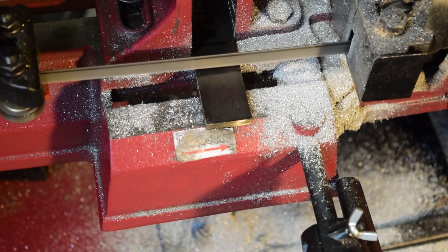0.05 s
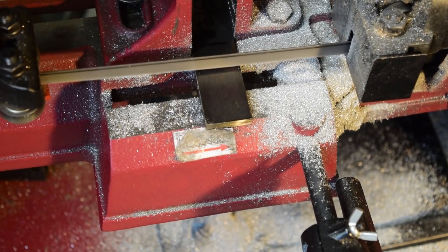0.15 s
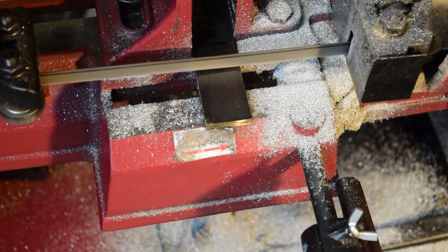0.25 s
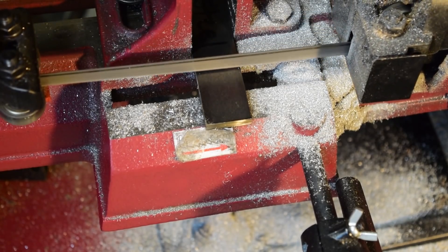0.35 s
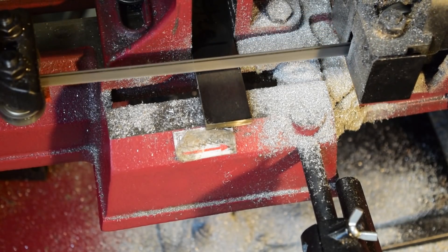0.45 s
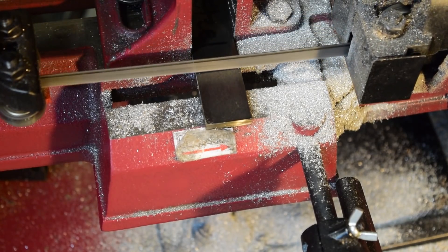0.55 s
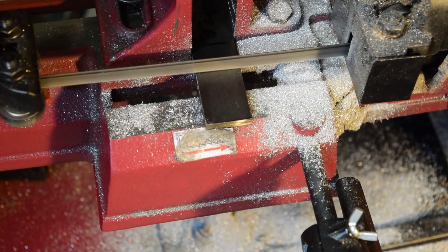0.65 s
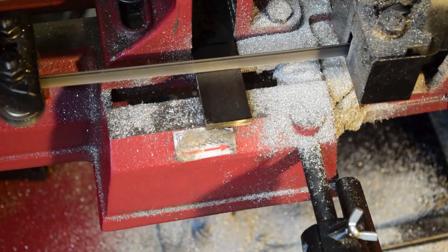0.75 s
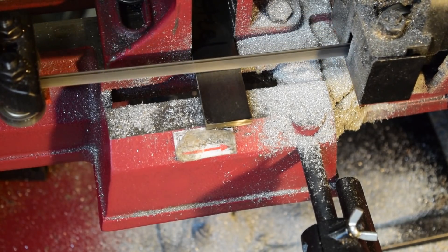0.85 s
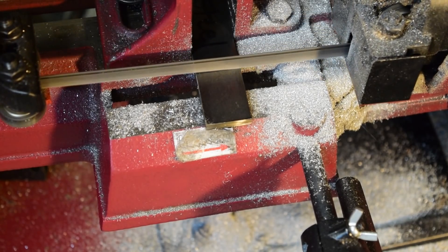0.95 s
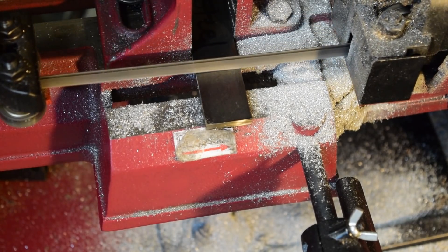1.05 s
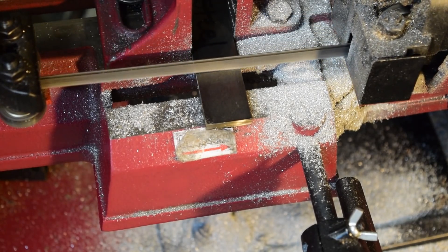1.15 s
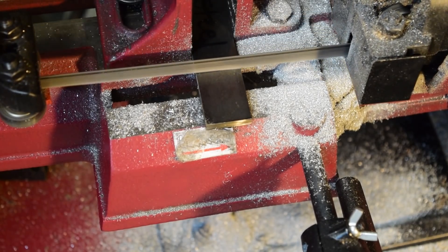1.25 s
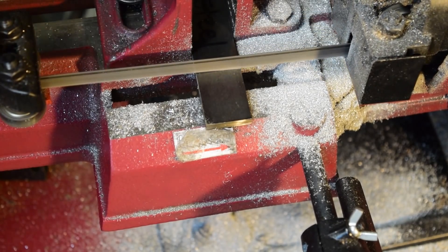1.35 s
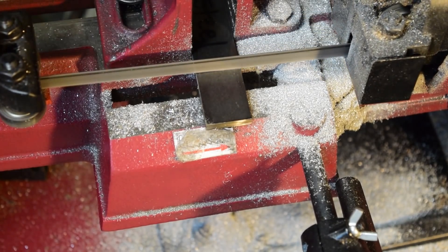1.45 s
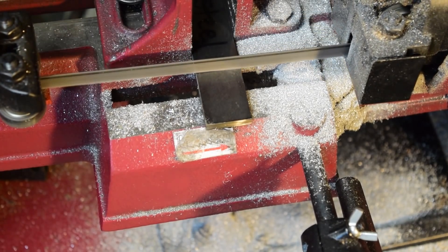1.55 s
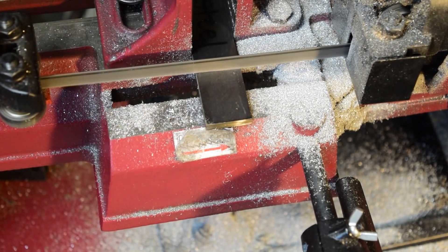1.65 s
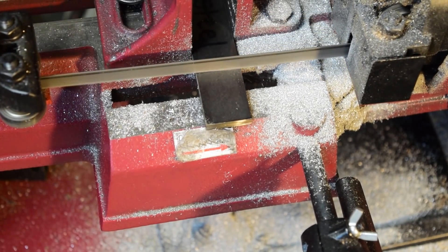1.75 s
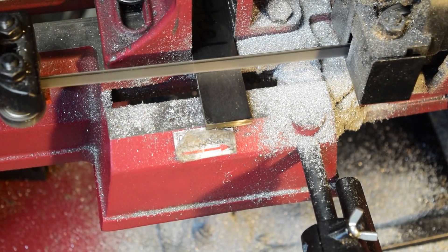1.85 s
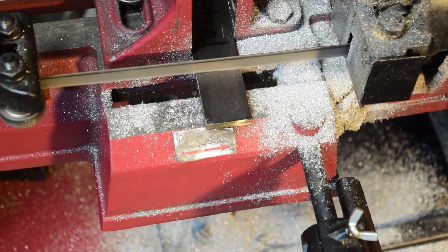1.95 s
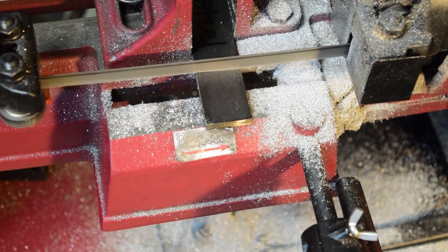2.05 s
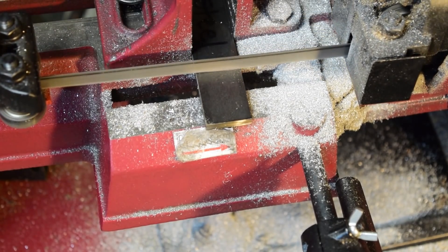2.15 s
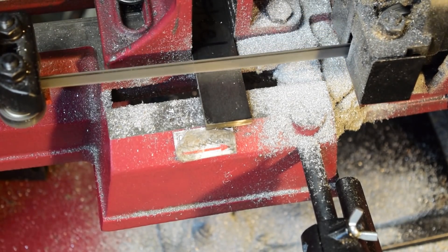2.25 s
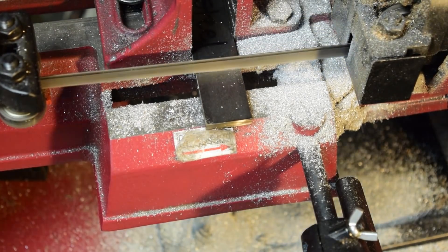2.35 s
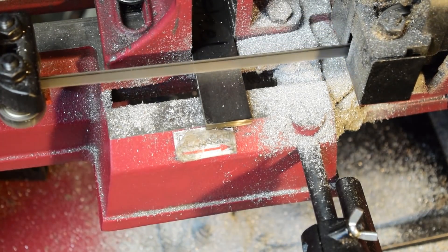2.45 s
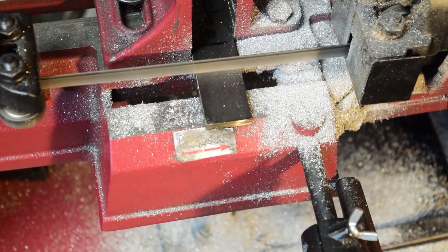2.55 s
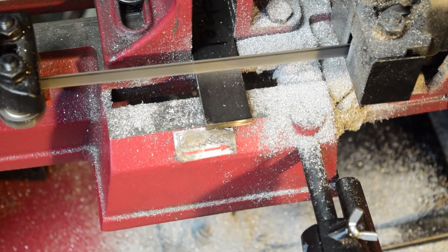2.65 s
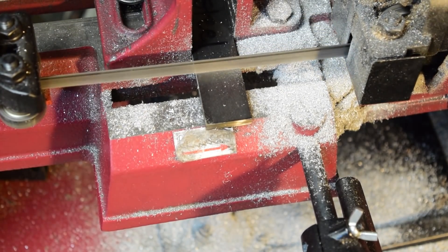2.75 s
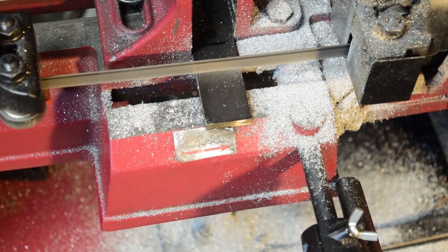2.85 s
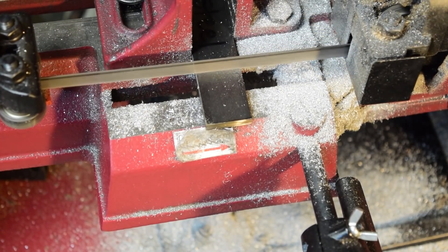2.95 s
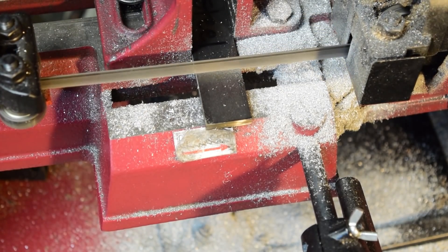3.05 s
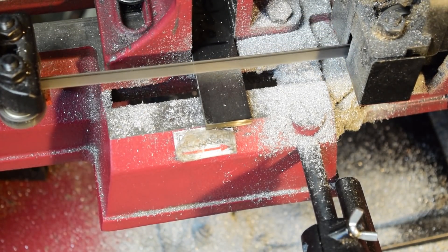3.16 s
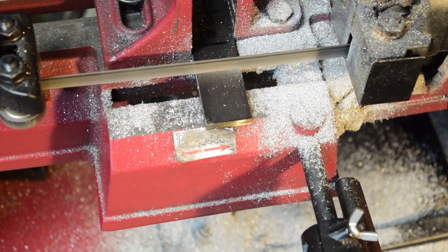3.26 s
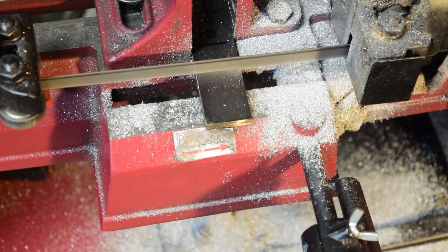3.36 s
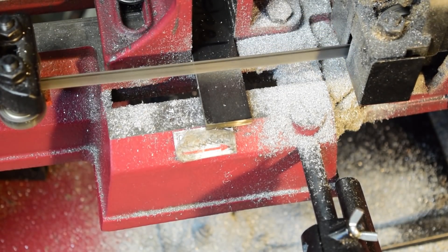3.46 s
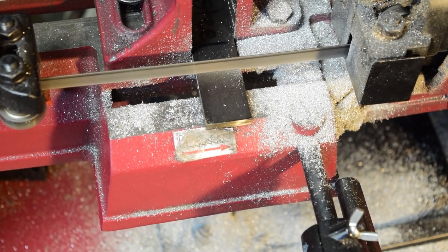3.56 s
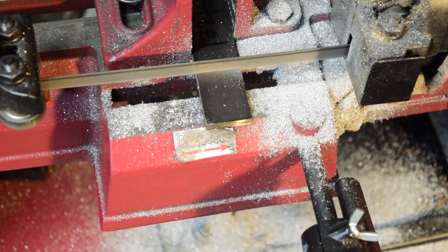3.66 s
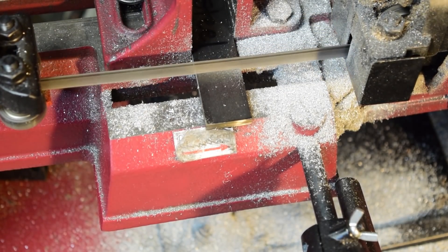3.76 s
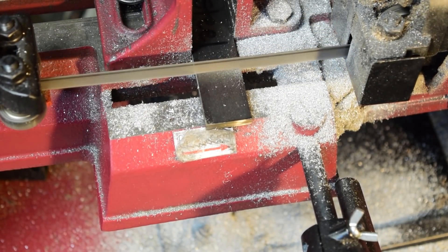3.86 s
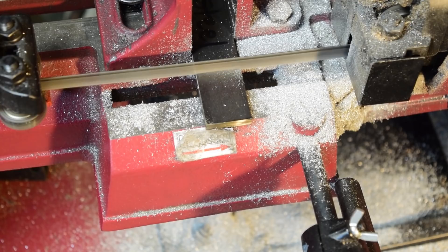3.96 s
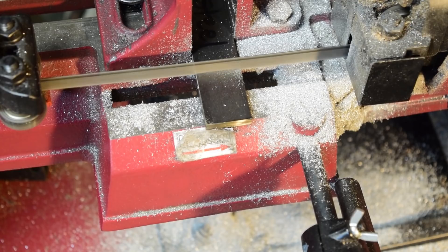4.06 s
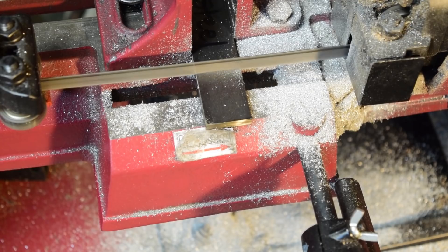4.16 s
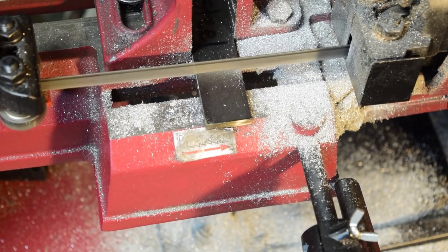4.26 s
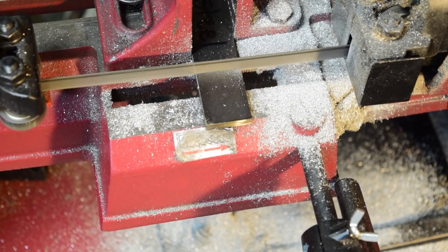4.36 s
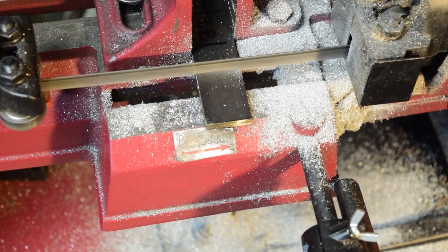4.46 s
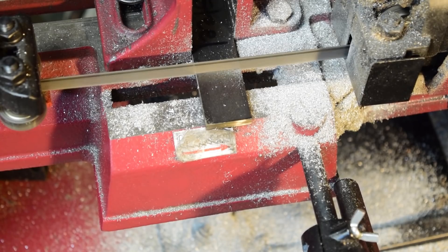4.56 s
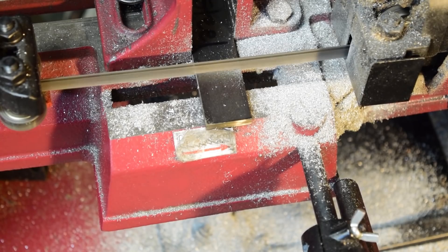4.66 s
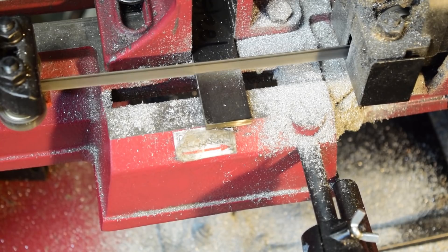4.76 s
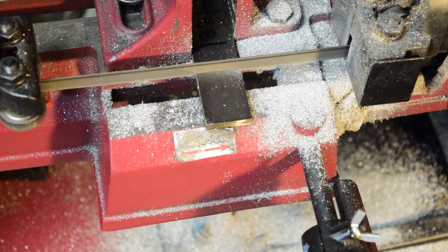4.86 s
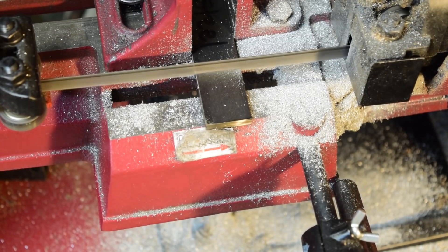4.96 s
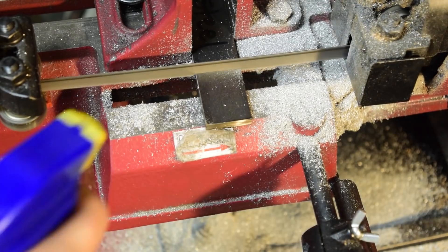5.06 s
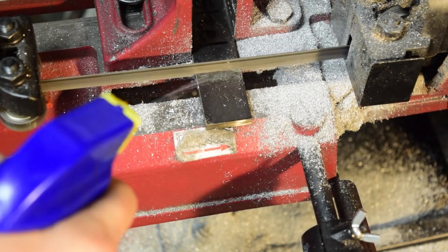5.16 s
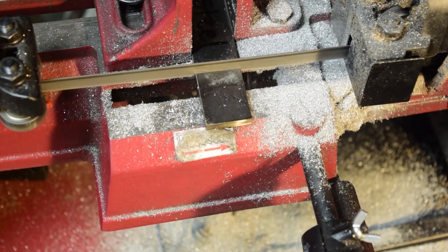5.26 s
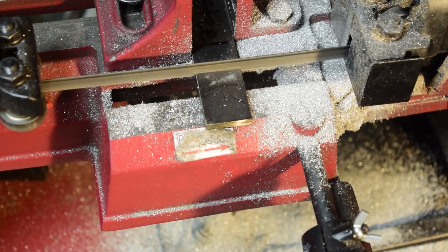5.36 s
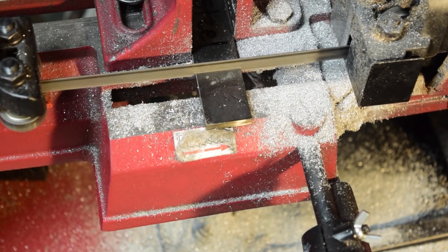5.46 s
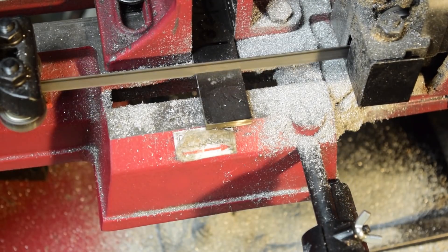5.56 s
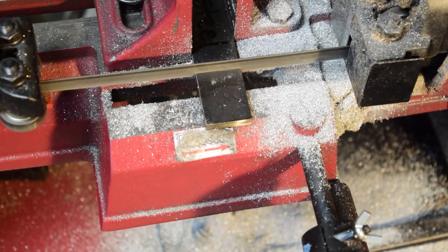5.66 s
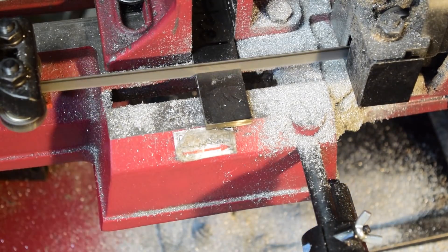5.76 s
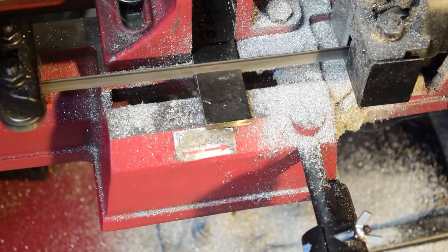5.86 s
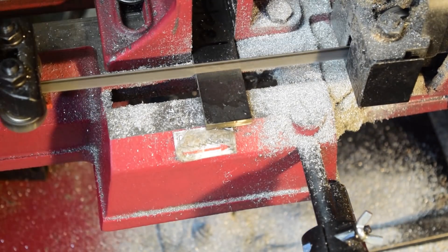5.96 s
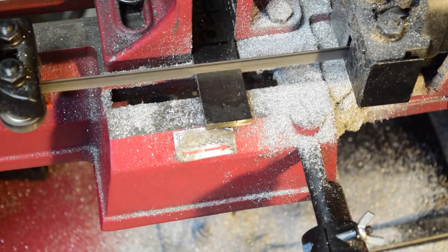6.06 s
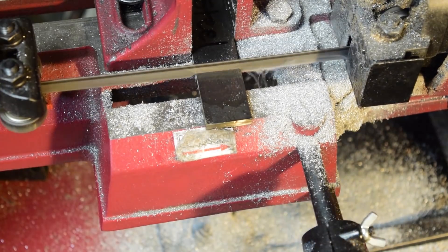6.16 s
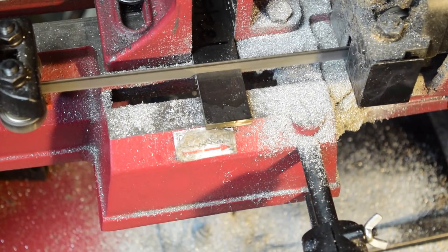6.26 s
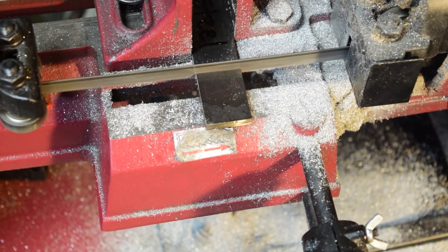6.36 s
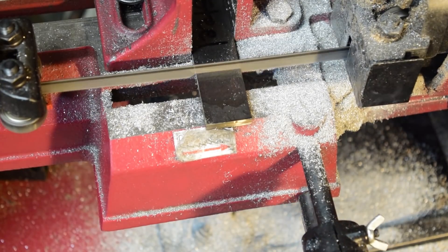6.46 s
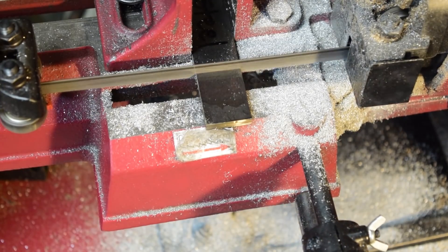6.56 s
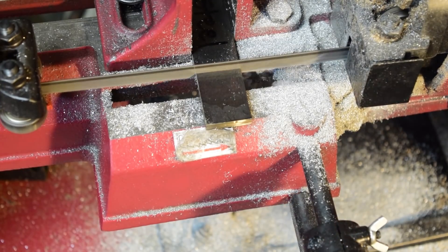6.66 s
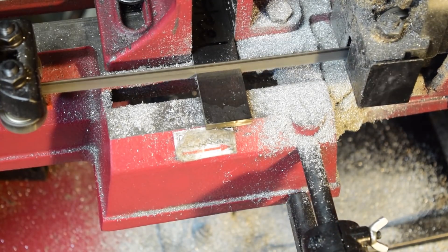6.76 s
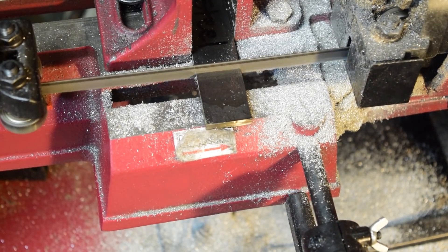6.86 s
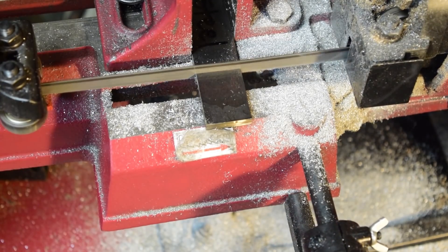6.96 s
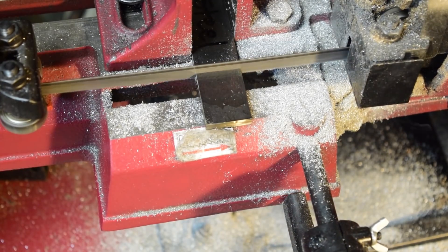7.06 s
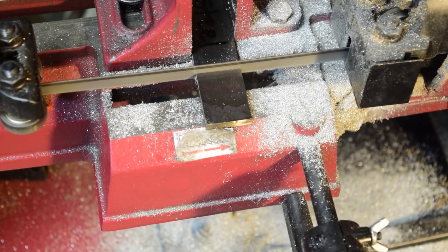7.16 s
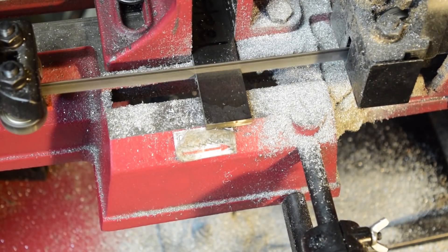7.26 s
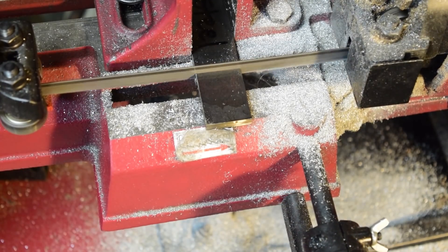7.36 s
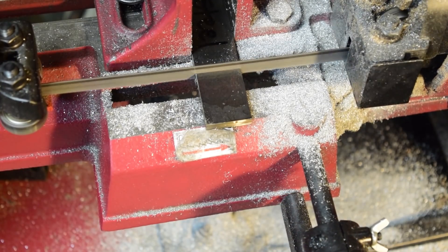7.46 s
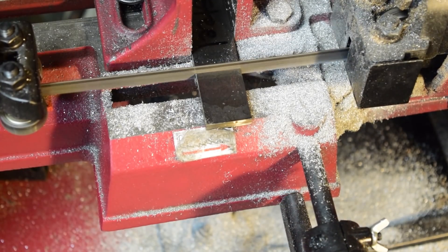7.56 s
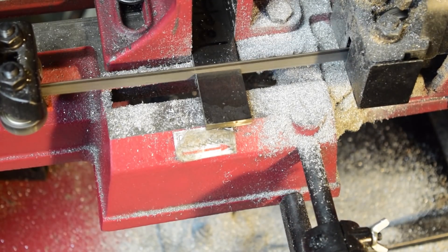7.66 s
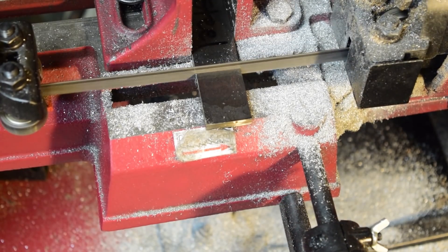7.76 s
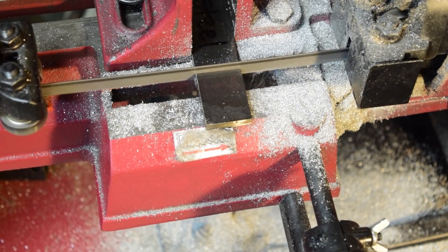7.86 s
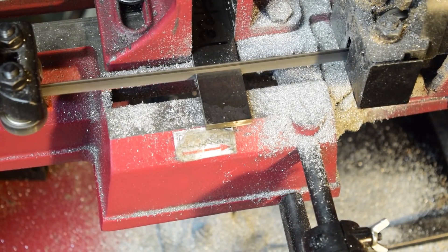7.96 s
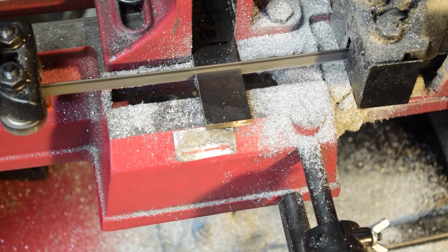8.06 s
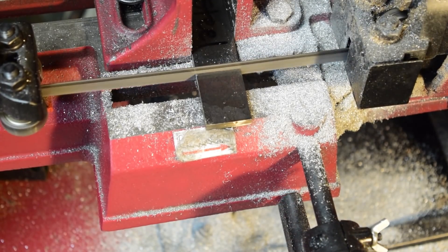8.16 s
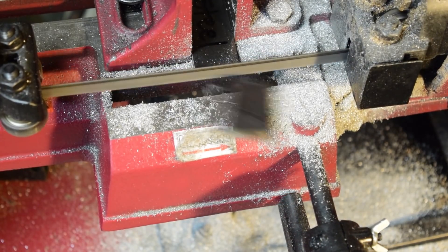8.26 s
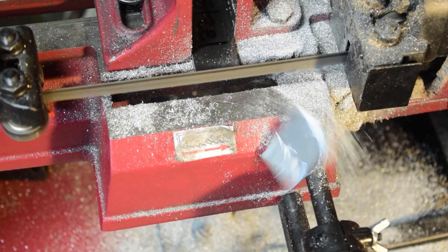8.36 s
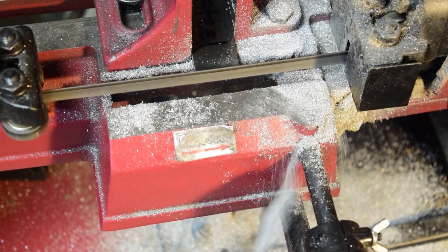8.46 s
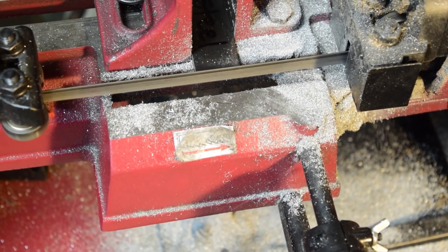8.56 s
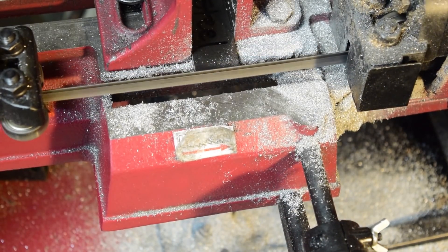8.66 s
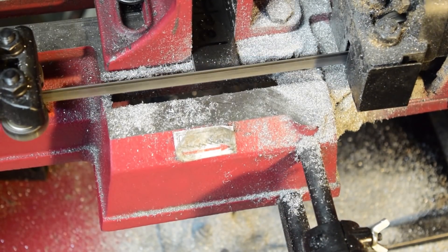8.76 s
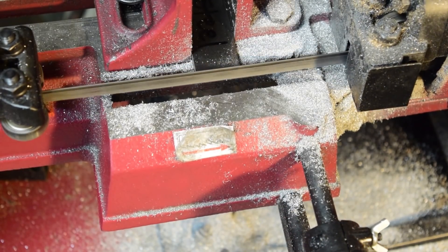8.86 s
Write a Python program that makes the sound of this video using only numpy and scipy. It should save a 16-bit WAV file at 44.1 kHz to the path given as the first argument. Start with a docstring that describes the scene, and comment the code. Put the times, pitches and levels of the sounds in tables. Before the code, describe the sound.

Close metal sawing: rattly motor hum, scraping contact, gritty rasp and throbbing high squeal, then late yelps, a plunging ring and a bright steel clang.

```python
"""In a workshop, close to a horizontal band saw: the motor hums and shakes the frame, the blade touches a steel
bar, bites, squeals for over three seconds and rasps on until the offcut breaks free and clangs on the floor.
Motor, teeth and squeal are noise and tones ringing through resonances; scrapes, chirps and ticks are short bursts.
Through the middle of the cut these steady layers come back in fading copies about 43 ms apart."""
import sys
import numpy as np
from scipy import signal
from scipy.fft import rfft, irfft, next_fast_len
from scipy.io import wavfile
from scipy.ndimage import uniform_filter1d, map_coordinates

SR = 44100
rng = np.random.default_rng(int(sys.argv[2]) if len(sys.argv) > 2 else 0)


def dump(signal):
    """Clip the signal to [-1, 1] and save it as 16-bit WAV at the path in sys.argv[1]."""
    limited = np.clip(np.atleast_2d(signal).T, -1, 1)
    pcm = np.round(limited * 32767).astype(np.int16)
    wavfile.write(sys.argv[1], SR, pcm)


N = 393318

# Motor and frame. Each row: time in seconds, hum level in dB, frame level in dB.
DRIVE_LEVELS = [(0, -41.5, -37), (.45, -40.5, -33.5), (1.05, -45.5, -33.5), (2.3, -45, -35),
                (2.4, -45.5, -33.5), (2.75, -56, -42), (3.7, -62, -47), (5.4, -62, -48.5), (5.46, -60, -43),
                (6.2, -59.5, -39.5), (8.16, -56, -36.5), (8.2, -53, -33), (8.26, -60, -34),
                (8.32, -56, -37), (8.45, -47, -36.5), (8.48, -58, -40.5), (8.55, -61, -42),
                (8.7, -72, -45.5)]
# Load on the drive. Each row: time in seconds, share from 0 to 1.
LOAD = [(0, 0), (1.1, 0.02), (1.4, 0.52), (2.3, 0.59), (2.8, 1), (8.92, 0.87)]
# Low rumble of the motor. Each row: frequency in Hz, relative density in dB.
RUMBLE_COLOUR = [(24, -58), (40, -40), (65, -12), (85, -14), (108, 3), (135, -11), (168, -5.5), (231, 1.5),
                 (311, -4.5), (350, -1), (460, -32), (770, -120)]
# Resonances of the frame. Each row: centre in Hz, width in Hz, relative gain running light in dB, under load in dB.
FRAME_MODES = [(221.4, 22, -5.5, -20.5), (281.8, 12, -5.5, -13), (359.6, 13.3, -2, -8.5),
               (400.3, 26.5, -5, -4.5), (454.8, 23.2, 2.5, -1), (472.8, 24, -3.5, 0.5),
               (611, 112, -8.5, -10.5), (793, 26.5, -10, -6.5), (860, 31.6, 5, -4.5), (899.4, 47, -0.5, -5),
               (1133, 300, -14, -14), (1629, 134, -9, -13), (1790, 140, -19.5, -16.5), (2285, 69, -16, -27),
               (3300, 26, -30, -32), (4410, 94, -12.5, -20), (4860, 150, -14, -33)]
# Motor noise between those resonances. Each row: frequency in Hz, relative density in dB.
WHIR_COLOUR = [(30, -41), (120, -14), (200, -15), (321, -8), (454, -9.5), (677, -8), (874, -4.5),
               (1280, -13.5), (4920, -19.5), (10400, -36), (15500, -57)]
# Gear tones. Each row: frequency in Hz, level against the frame running light in dB, under load in dB.
GEAR_TONES = [(280, -15.5, -43), (360, -20, -55), (476.5, -37, -3), (774, -4, -27), (803, -7, -42),
              (844, -9.5, -37), (891.5, -9, -16), (1026, -15, -48), (1210, -14, -70), (1643, -23, -60),
              (1870, -12.5, -50)]
DRIVE_SWAY_DB, CUT_SWAY_DB = 1, 0.7  # random wander of the levels, rms

# Knocks in the frame. Each row: start in seconds, low mode level in dB, upper modes level in dB.
KNOCKS = [(0.454, -26, -30), (2.403, -36, -37), (2.685, -31.5, -36), (5.006, -35, -36.5), (8.186, -27, -38),
          (8.204, -28, -27), (8.232, -36, -27), (8.279, -33, -40), (8.345, -31, -42), (8.381, -32, -33)]
# What a knock rings. Each row: centre in Hz, width in Hz, relative gain in dB.
KNOCK_MODES = [(457, 28, 0), (937, 70, -2), (1440, 41, -6)]
# A lumpy low flutter through the middle of the cut. Each row: time in seconds, level in dB.
FLUTTER_LEVELS = [(0, -90), (2.25, -113), (2.3, -75), (3, -67), (5.5, -67), (6.3, -66), (6.8, -80),
                  (8.2, -68), (8.5, -88)]

# Teeth in the steel. Each row: time in seconds, rasp level in dB, fizz level in dB.
CUT_LEVELS = [(0, -44.5, -55), (.62, -47, -56), (.655, -35.5, -40), (.8, -38.5, -47), (.87, -38.5, -43),
              (.93, -33, -41.5), (1.07, -33, -40), (1.15, -35, -42.5), (2.27, -35, -41), (2.31, -37, -42),
              (2.38, -30.5, -38.5), (2.55, -33, -39.5), (2.76, -36.5, -41.5), (3.7, -42, -44.5),
              (5.4, -45, -46), (5.46, -40.5, -45), (6.2, -38.5, -46.5), (8.02, -35, -41.5),
              (8.25, -38.5, -43), (8.31, -53, -46), (8.39, -42, -41), (8.41, -41, -54), (8.44, -48, -44),
              (8.47, -47, -47.5), (8.7, -63, -54), (8.85, -57, -66)]
# Depth of the blade. Each row: time in seconds, kerf stage (0 touch to 4 late, held at 0 below that),
# level of the ringing modes over the broad rasp in dB.
DEPTH = [(0, -1, -12), (.85, 0.7, 1), (.95, 1.16, 1.5), (2.3, 1.43, 1.5), (2.8, 1.2, -3.5),
         (5.4, 2.5, -0.5), (5.8, 2, -0.5), (6.9, 3, -3.5), (7.4, 3.5, -2.5), (8.3, 4, -10), (8.92, 4, -12)]
# Blade and bar resonances, one table per kerf stage. Each row: centre in Hz, width in Hz, relative gain in dB.
TOUCH_MODES = [(1660, 30, -3), (2240, 130, -2), (3070, 77, -12), (3240, 40, -5), (5360, 130, -3),
               (5800, 61, -7), (5950, 38, 0), (6270, 53, -2), (7170, 43, -7)]
SHALLOW_MODES = [(1643, 19, -1.5), (2060, 280, -6.5), (3105, 103, 3.5), (3177, 250, -1), (3836, 18, -1.5),
                 (4460, 120, -18), (5400, 55, -4.5), (5700, 68, -6), (6340, 70, -4.5), (6790, 44, -9),
                 (7120, 130, -14)]
HALFWAY_MODES = [(1610, 45, 0), (2357, 40, 2.5), (2436, 76, -2.5), (2840, 240, -11), (3004, 34, 1),
                 (3073, 58, 0), (3154, 60, 0.5), (3460, 43, -1.5), (4560, 260, -11), (5270, 66, -12),
                 (6100, 45, -4), (6330, 60, -15)]
DEEP_MODES = [(1444, 47, 3), (1900, 45, -23), (2350, 140, 0.5), (2710, 200, -2), (3040, 180, 2.5),
              (3740, 48, -2), (4500, 630, -3), (5900, 250, -16), (6900, 58, -13)]
LATE_MODES = [(1406, 29, 3.5), (1915, 100, -2), (2425, 65, 2.5), (2780, 120, -2), (3270, 130, 2),
              (4430, 100, -8), (4890, 55, -18), (5770, 260, -13), (6930, 75, -14)]
# High resonances that chips excite, shallow and deep. Each row: centre in Hz, width in Hz, relative gain in dB.
HIGH_SHALLOW_MODES = [(7660, 87, 8.5), (8520, 250, 0.5), (9820, 110, 2.5), (11500, 200, -0.5),
                      (12900, 300, -5)]
HIGH_DEEP_MODES = [(8840, 130, 6), (9440, 55, 6), (11300, 85, 2), (13360, 160, -6)]
# Broad part of the rasp, then the fizz of chips. Each row: frequency in Hz, relative density in dB.
RASP_COLOUR = [(530, -21.5), (900, -17), (1450, -11.5), (1740, -4.5), (1890, -1.5), (3060, -0.5),
               (3300, -1), (3500, -1), (8000, -32), (10400, -28), (17600, -120)]
FIZZ_COLOUR = [(2940, -47), (5000, -2), (5560, -4.5), (6510, -6.5), (6630, -3.5), (7330, -4.5), (7550, -5),
               (10600, -6), (11600, -10.5), (13800, -11.5), (15700, -23)]

# Short events; their levels are taken before the burst envelope.
# Scrapes of the blade on steel. Each row: start in seconds, level in dB.
SCRAPES = [(0.015, -38.5), (0.092, -38.5), (0.193, -37.5), (0.266, -38.5), (0.312, -47), (0.4, -40),
           (0.4294, -33), (0.4773, -33.5), (0.531, -35.5), (0.633, -39), (8.19, -40), (8.235, -37),
           (8.359, -33), (8.434, -42)]
# Chirps of single modes of blade and frame. Each row: start in seconds, level in dB, pitch in Hz.
CHIRPS = [(0.425, -34, 3240), (0.475, -35, 3180), (0.525, -39, 3200), (0.642, -32, 5330),
          (0.681, -32, 2250), (0.72, -32, 2190), (0.809, -31, 2170), (0.909, -41, 3000), (1.032, -25, 3240),
          (1.437, -24, 3120), (1.88, -35, 3220), (2.422, -29, 2390), (4.735, -36, 3090), (5.73, -39, 2430),
          (5.775, -39, 2420), (6.024, -33, 2440), (6.105, -36, 2800), (6.257, -30, 2510),
          (6.305, -35, 3060), (6.348, -35, 3080), (6.5, -35, 3000), (6.555, -33, 3000),
          (6.953, -27.5, 2410), (7.44, -36, 2500), (8.03, -36, 3250), (8.2, -37, 2470),
          (8.415, -33.5, 1150), (8.49, -38, 1200), (8.555, -39, 870), (8.62, -43, 1250)]
# Flickers of the top treble. Each row: start in seconds, level in dB.
FLICKERS = [(7.3372, -45), (7.5812, -42), (7.6321, -45), (7.8294, -45), (7.8805, -42), (8.094, -43),
            (8.1204, -47)]
# Bright ticks as the offcut slides off. Each row: start in seconds, level in dB.
TICKS = [(8.372, -28), (8.388, -36)]
SCRAPE_S, CHIRP_S, FLICKER_S, KNOCK_S, TICK_S = 0.026, 0.03, 0.025, 0.022, 0.0089  # fall times

# Sharp clicks as the repeats set in. Each row: centre in seconds, peak in dB before the band limit.
CLICKS = [(2.2958, -11), (2.33846, -5), (2.38113, -8), (2.4238, -19)]
# Drop of the saw's level. The entries: start in seconds, depth in dB, return time in seconds.
DIP = (2.297, -5.5, 0.018)
# The repeats. The entries: start in seconds, end in seconds, spacing in seconds.
REPEAT = (2.3, 8.2, 2048 / 48000)
# Strength of each successive copy, as gain against the first sound.
COPY_GAINS = [.37, .3, .2, .14]

# Blade squeal. Each row: time in seconds, level in dB, second partial in dB, third partial in dB.
SQUEAL_LEVELS = [(2.33, -55, -65, -70), (2.45, -28.5, -45, -57), (2.66, -27, -41, -47),
                 (2.85, -28, -39.5, -45), (3.8, -31, -40, -45.5), (5.2, -31, -40, -45.5),
                 (5.42, -30.5, -39.5, -45), (5.5, -31.5, -43, -52), (5.63, -36, -41, -64),
                 (5.67, -36.5, -60, -70), (5.9, -42, -65, -70), (5.95, -67, -70, -75)]
# Bandwidth of each squeal partial in Hz.
PARTIAL_WIDTHS = [150, 250, 380]
# Late yelps of the squeal. Each row: centre in seconds, level in dB.
YELPS = [(7.02, -42), (7.45, -46), (7.76, -39), (7.97, -43), (8.12, -38)]
# Strong single lumps of the squeal. Each row: start of the swell in seconds, level in dB before LUMP_SHARE.
LUMPS = [(2.4244, -21), (2.6884, -16), (2.7554, -16.5), (2.7726, -18), (2.824, -18), (3.411, -23),
         (3.428, -18), (3.456, -17), (3.481, -22), (3.5374, -18), (3.5623, -19), (3.6077, -20),
         (3.6521, -16), (3.697, -19), (3.7394, -21), (3.7559, -19), (3.8122, -25), (3.8583, -18),
         (3.873, -19), (3.948, -19), (4.621, -20), (4.7125, -17), (4.838, -20), (5.014, -19), (5.1537, -20),
         (5.3218, -19), (5.3394, -24), (5.4301, -23), (5.458, -24), (5.5413, -19.5), (5.6181, -22),
         (5.6411, -19), (7.7503, -29), (7.9269, -24), (7.9633, -26), (7.9814, -25), (8.0054, -23),
         (8.108, -26), (8.1274, -28), (8.1419, -24)]
SQUEAL_HZ = 1916
YELP_DB_PER_S, YELP_SECOND_DB = 140, -26  # slope either side of the centre; second partial against the first
OVERTONE_PULSE_DB, OVERTONE_PULSES_PER_S = 1.6, 24  # random pulsing of the overtones
THROB_HZ, THROB_SPREAD_HZ, THROB_DB = 45, 12, 1.3  # an almost even beat
LUMP_RISE_S, LUMP_S, LUMP_SHARE = 0.0044, 0.0051, 0.46  # start to crest, half width, gain
STEADY_S, LULL_DB, LULL_S = 0.07, -5, 0.011  # evening span; the squeal falls back around its lumps

# The offcut on its thinning bridge of steel. Each row: time in seconds, upper mode in Hz, its level in dB,
# lower mode in Hz, its level in dB.
BRIDGE = [(5.4, 11500, -85, 4574, -85), (5.6, 11430, -61, 4600, -50), (6.3, 11300, -53, 4585, -47.5),
          (7, 11160, -48.5, 5040, -63), (7.6, 10600, -44, 4940, -43.5), (8.0, 9650, -41, 4330, -52),
          (8.12, 8820, -45, 3890, -55), (8.18, 7220, -44, 3354, -53), (8.23, 6630, -40, 2810, -51),
          (8.26, 5070, -40, 2500, -52), (8.28, 4000, -72, 2000, -59)]
# The offcut lands. The entries: time in seconds, level of a 0 dB mode in dB before the peaks are flattened.
LANDING = (8.7465, -23.5)
# Modes of the offcut. Each row: frequency in Hz, relative level in dB, time to fall 60 dB in seconds.
OFFCUT_MODES = [(520, -17, .25), (1270, -14, .4), (1747, -11, .4), (2285, -8, .27), (2403, -2, .26),
                (2453, -7, .2), (2968, -8, .35), (3335, -2, .2), (3357, 2, .21), (3612, -14, .3),
                (4144, -2, .24), (4210, -4, .2), (4840, -19, .4), (5178, -11, .3), (5195, -6, .37),
                (5486, -19, .25), (5932, -19, .3), (6577, -8, .28), (7127, -18, .45), (7725, -15, .4),
                (8215, -21, .4), (8388, -12, .3), (9432, -26, .35), (10630, -16, .36), (11130, -26, .35),
                (11780, -14, .38), (11890, -24, .5), (12020, -28, .4), (12610, -30, .35), (13860, -32, .35),
                (14250, -19, .33), (14560, -38, .4)]
BAND_LIMIT_HZ = 15750


def amp(db):
    """dB to gain."""
    return 10 ** (np.asarray(db) / 20)


def unit(x):
    """Scaled to rms 1."""
    return x / np.sqrt(np.mean(np.abs(x) ** 2) + 1e-20)


def white():
    """Plain white noise over the whole scene."""
    return rng.standard_normal(N)


def curves(rows):
    """One value per sample for each column after the time."""
    s, *columns = np.transpose(rows)
    return [np.interp(np.arange(N) / SR, s, column) for column in columns]


def wobble(rate):
    """A smooth random curve, rate knots a second."""
    knots = rng.standard_normal(int(N * rate / SR) + 4)
    return map_coordinates(knots, [np.arange(N) * rate / SR])


def filtered(x, response):
    """x times a complex response of frequency."""
    m = next_fast_len(N + SR // 2)
    return irfft(rfft(x, m) * response(np.fft.rfftfreq(m, 1 / SR)), m)[:N]


def colour(points):
    """Gain drawn through (Hz, dB) points on a log axis."""
    f, db = np.transpose(points)
    return lambda hz: amp(np.interp(np.log(hz + 1), np.log(f + 1), db))


def modes(rows):
    """Causal response of a set of resonances, in alternating polarity."""
    def response(f):
        return sum((-1) ** k * amp(db) * 1j * f * width / (hz * hz - f * f + 1j * f * width)
                   for k, (hz, width, db) in enumerate(rows))
    return response


def patchy(patchy_db):
    """White noise with patches of random gain in time and frequency."""
    z = signal.stft(rng.standard_normal(N + 512), nperseg=512)[2]
    across_frequency = uniform_filter1d(rng.standard_normal(z.shape), 5, 0)
    field = uniform_filter1d(across_frequency, 8, 1)
    return signal.istft(z * amp(patchy_db * unit(field)), nperseg=512)[1][:N]


def bursts(rows, rise, length):
    """Envelope of (s, dB) events: a quick rise and a fall over the length."""
    out, age = np.zeros(N + SR), np.arange(SR // 4) / SR
    shape = (1 - np.exp(-age / rise)) * np.exp(-(age / length) ** 2)
    for s, db, *_ in rows:
        out[round(s * SR):][:len(age)] += amp(db) * shape
    return out[:N]


def narrow(hz, width_hz):
    """Noise in a narrow band that follows a pitch curve."""
    slow = lambda: filtered(white(), lambda f: 1 / (1 + (2 * f / width_hz) ** 2))
    phase = 2 * np.pi * np.cumsum(hz) / SR
    return unit(slow() * np.cos(phase) + slow() * np.sin(phase))


def steady(x, span_s):
    """Swells slower than the span are evened out."""
    power = np.abs(uniform_filter1d(x ** 2, round(span_s * SR)))
    return x / np.sqrt(power + 0.01)


def blend(a, b, share):
    """From noise a to noise b at even power."""
    share = np.clip(share, 0, 1)
    return np.sqrt(1 - share) * unit(a) + np.sqrt(share) * unit(b)


def motor_hum():
    """Mains hum, a slightly wavering sine, over a low rumble of noise."""
    level_db = curves(DRIVE_LEVELS)[0] + DRIVE_SWAY_DB * wobble(8.9)
    phase = 2 * np.pi * 120.1 * np.arange(N) / SR + 0.098 * wobble(4.5)
    hum = np.sqrt(2) * amp(0.82 * wobble(6.1)) * np.sin(phase)
    rumble = amp(-3.5) * unit(filtered(patchy(0.5), colour(RUMBLE_COLOUR)))
    return amp(level_db) * (hum + rumble)


def frame():
    """Gears and wheels shake the frame: noise in its resonances and wavering gear tones, which shift with load."""
    level_db = curves(DRIVE_LEVELS)[1] + DRIVE_SWAY_DB * wobble(7.3)
    load = np.clip(curves(LOAD)[0], 0, 1)
    light = modes([(hz, width, light_db) for hz, width, light_db, _ in FRAME_MODES])
    loaded = modes([(hz, width, loaded_db) for hz, width, _, loaded_db in FRAME_MODES])
    ringing = blend(filtered(patchy(0.8), light), filtered(patchy(1.2), loaded), load)
    whir = amp(-4.0) * unit(filtered(patchy(1.0), colour(WHIR_COLOUR)))
    turn = 2 * np.pi * np.arange(N) / SR
    gears = np.zeros(N)
    for hz, light_db, loaded_db in GEAR_TONES:
        gear_db = light_db + (loaded_db - light_db) * load + 2.4 * wobble(23.7)
        gears += amp(gear_db) * np.sin(hz * turn + 0.4 * wobble(15.7))
    return amp(level_db) * (ringing + whir + gears)


def knocks():
    """A knock now and then rings a low mode and a pair of upper modes, each as a burst of resonant noise."""
    out = np.zeros(N)
    for k, rows in enumerate((KNOCK_MODES[:1], KNOCK_MODES[1:])):
        envelope = bursts([(s, db[k]) for s, *db in KNOCKS], 0.0086, KNOCK_S)
        out += envelope * steady(unit(filtered(white(), modes(rows))), KNOCK_S)
    return out


def flutter():
    """Low noise of uneven strength, a lumpy flutter."""
    lumpy = amp(3.4 * wobble(15)) * white()
    low = unit(filtered(lumpy, colour([(15, -8), (40, 3), (90, 2), (200, -28)])))
    return amp(curves(FLUTTER_LEVELS)[0]) * low


def jolts():
    """Dense uneven jolts of teeth tearing chips: patchy noise with fast and slow random gain."""
    return patchy(1.1) * amp(1.5 * wobble(900) + 0.9 * wobble(30))


def radiated(rows, corner_hz):
    """Resonances of small parts, which radiate little bass."""
    return lambda f: modes(rows)(f) * f / (f + 1j * corner_hz)


def teeth():
    """Jolts of the teeth ring blade and bar, whose modes shift as the kerf deepens; chips add a bright fizz."""
    rasp_db, fizz_db = curves(CUT_LEVELS) + CUT_SWAY_DB * wobble(7.4)
    stage, clear_db = curves(DEPTH)
    drives = jolts(), jolts()  # neighbouring stages get independent noise
    rasp = np.zeros(N)
    for k, rows in enumerate((TOUCH_MODES, SHALLOW_MODES, HALFWAY_MODES, DEEP_MODES, LATE_MODES)):
        nearness = np.clip(1 - np.abs(np.clip(stage, 0, 4) - k), 0, 1)
        rasp += np.sqrt(nearness) * unit(filtered(drives[k % 2], radiated(rows, 1500)))
    broad = amp(-0.5) * unit(filtered(patchy(2.03), colour(RASP_COLOUR)))
    spray = patchy(1.6) * amp(2.8 * wobble(1500) + 0.6 * wobble(25))
    fizz = unit(filtered(spray, colour(FIZZ_COLOUR)))
    chips_shallow = filtered(jolts(), radiated(HIGH_SHALLOW_MODES, 8000))
    chips_deep = filtered(jolts(), radiated(HIGH_DEEP_MODES, 8000))
    chips = blend(chips_shallow, chips_deep, (stage - 1) / 2.2)
    return amp(rasp_db) * (amp(clear_db) * rasp + broad) + amp(fizz_db) * (fizz + amp(clear_db - 4.5) * chips)


def scrapes():
    """The blade scrapes on steel: short bursts of noise strongest around 2 kHz."""
    points = [(300, -40), (2000, 3.0), (7000, -7.5), (10000, -6), (12500, -16), (15500, -28)]
    return bursts(SCRAPES, 0.0035, SCRAPE_S) * unit(filtered(white(), colour(points)))


def chirps():
    """Single modes of blade and frame sound briefly: bursts of narrow noise, each at its own pitch."""
    s, _, hz = np.transpose(CHIRPS)
    latest = np.searchsorted(s, np.arange(N) / SR) - 1
    pitch = hz[np.clip(latest, 0, None)]
    return bursts(CHIRPS, 0.008, CHIRP_S) * narrow(pitch, 280)


def clicks():
    """One-sided spikes, about 0.04 ms wide at half height before the band limit."""
    t = np.arange(N) / SR
    return sum(amp(db) * np.exp(-((t - s) / 2.3e-5) ** 2) for s, db in CLICKS)


def dip():
    """A gain that drops suddenly, just after the first click, and heals quickly."""
    s, db, back = DIP
    age = np.arange(N) / SR - s
    return amp(db * (age > 0) * np.exp(-(age / back) ** 2))


def repeats(x):
    """Between start and end, fading copies follow the sound at equal spacing, at about unchanged loudness."""
    start, end, spacing = REPEAT

    def comb(f):
        return 1 + sum(g * np.exp(-2j * np.pi * f * spacing * (k + 1)) for k, g in enumerate(COPY_GAINS))

    t = np.arange(N) / SR
    on = np.clip(np.minimum(t - start, end - t) / 0.08, 0, 1)  # 80 ms fades
    repeated = filtered(x, comb) / np.sqrt(1 + np.sum(np.square(COPY_GAINS)))
    return (1 - on) * x + on * repeated


def squeal():
    """The squeal throbs quickly: a fuzzy tone of steady pitch, and overtones that also pulse unevenly."""
    t = np.arange(N) / SR
    on = (t > SQUEAL_LEVELS[0][0]) & (t < SQUEAL_LEVELS[-1][0])
    first, second, third = (on * amp(db) for db in curves(SQUEAL_LEVELS))
    yelps = sum(amp(db - YELP_DB_PER_S * np.abs(t - s)) for s, db in YELPS)
    pulse = amp(OVERTONE_PULSE_DB * wobble(OVERTONE_PULSES_PER_S))
    near_lump = sum(np.exp(-((t - s - LUMP_RISE_S / 2) / LULL_S) ** 2) for s, _ in LUMPS)
    lull = amp(LULL_DB * np.clip(near_lump, 0, 1))
    gains = lull * (first + yelps), pulse * second + amp(YELP_SECOND_DB) * yelps, pulse * third
    throb = amp(THROB_DB * narrow(np.full(N, THROB_HZ), THROB_SPREAD_HZ))
    out = np.zeros(N)
    for k, (gain, width) in enumerate(zip(gains, PARTIAL_WIDTHS)):
        partial = throb * narrow(np.full(N, (k + 1) * SQUEAL_HZ), width)
        out += gain * steady(repeats(partial), STEADY_S)
    return out


def lumps():
    """Single strong swells at the pitch of the squeal: a sine of wandering phase under bell-shaped envelopes."""
    t = np.arange(N) / SR
    tone = np.sin(2 * np.pi * SQUEAL_HZ * t + 2.2 * wobble(60))
    swells = sum(amp(db) * np.exp(-((t - s - LUMP_RISE_S) / LUMP_S) ** 2) for s, db in LUMPS)
    return LUMP_SHARE * unit(tone) * swells


def bridge():
    """The offcut rings on its thinning bridge of steel: two bands of noise whose pitches finally plunge."""
    upper_hz, upper_db, lower_hz, lower_db = curves(BRIDGE)
    return amp(upper_db) * narrow(upper_hz, 1100) + amp(lower_db) * narrow(lower_hz, 430)


def flickers():
    """The top treble flickers: bursts of noise in a wide resonance."""
    return bursts(FLICKERS, 0.006, FLICKER_S) * unit(filtered(white(), modes([(13760, 1700, 0)])))


def ticks():
    """Bright ticks as the offcut slides off: very short bursts of noise strongest near 4.4 kHz."""
    points = [(3000, -30), (4400, 5), (8500, -10), (15500, -18)]
    return bursts(TICKS, 0.0015, TICK_S) * unit(filtered(white(), colour(points)))


def offcut():
    """The piece of steel hits the floor: a crack, a thud, its decaying modes, and the workshop's short answer."""
    s, db = LANDING
    start = round(s * SR)
    t = np.arange(N - start) / SR
    knots = np.arange(0, 0.3, 0.012)

    def waver():  # walls make each mode waver
        return np.minimum(2.5 + 80 * t, 5) * np.interp(t, knots, rng.standard_normal(len(knots)))

    def fall(t60):
        return amp(-60 * t / t60)

    ring = np.zeros(len(t))
    for hz, level, t60 in OFFCUT_MODES:
        rise = 1 - np.exp(-t / (0.008 * (hz / 10000) ** 3))  # high modes build up more slowly
        ring += amp(level + waver()) * fall(t60) * rise * np.cos(2 * np.pi * hz * t + waver() / 8)
    crack = 0.5 * fall(0.08) * rng.standard_normal(len(t))
    thud = 0.18 * fall(0.074) * np.sin(2 * np.pi * 105 * t)
    points = [(60, -22), (1000, -12.5), (3000, -7), (5000, -14.5), (9000, -23), (15000, -40)]
    shop = unit(filtered(white(), colour(points)))[start:]
    tail = 0.74 * fall(0.42) * shop
    return np.pad(amp(db) * (ring + crack + thud + tail), (start, 0))


def gain_control(clang):
    """The loud clang turns down the gain on the saw behind it; it returns slowly."""
    follow = np.abs(filtered(clang ** 2, lambda f: 1 / (1 + 1j * f / 0.8)))
    return 1 / np.sqrt(1 + follow / amp(-32.5) ** 2)


def scene():
    """The running saw with its repeats, then the falling piece, whose peaks are flattened."""
    machine = motor_hum() + frame() + knocks() + flutter()
    cutting = teeth() + bridge()
    contacts = scrapes() + chirps() + flickers() + ticks()
    saw = dip() * (repeats(machine + cutting) + squeal()) + lumps() + contacts + clicks()
    clang = offcut()
    flattened = clang / (1 + np.abs(clang / 0.15) ** 6) ** (1 / 6)
    return (saw * gain_control(clang) + flattened)[None]


def record(dry):
    """Nothing is kept above the band limit."""
    return filtered(dry[0], lambda hz: hz < BAND_LIMIT_HZ)[None]


dry = scene()
out = record(dry)
dump(out)
```